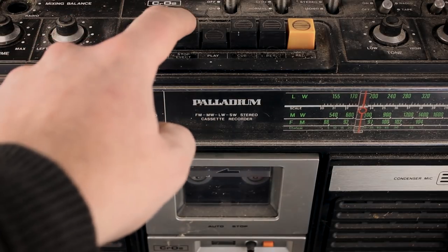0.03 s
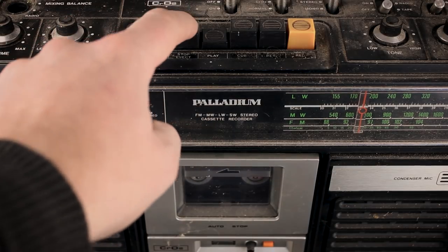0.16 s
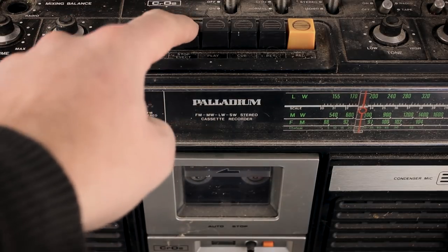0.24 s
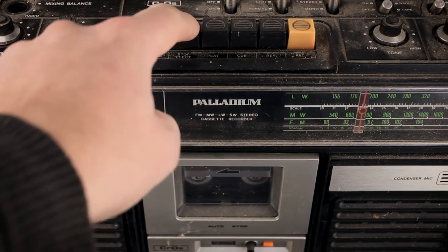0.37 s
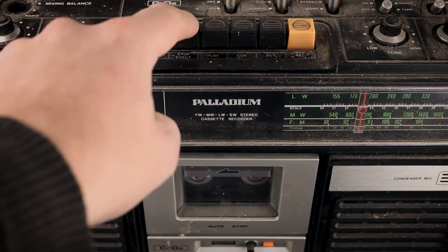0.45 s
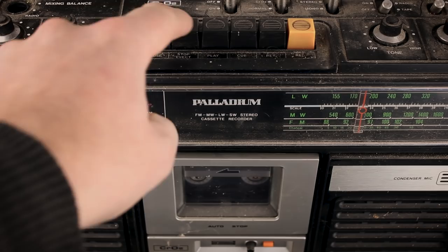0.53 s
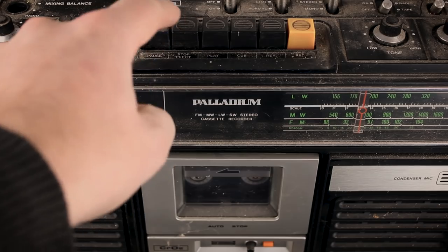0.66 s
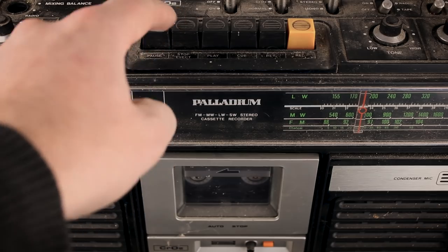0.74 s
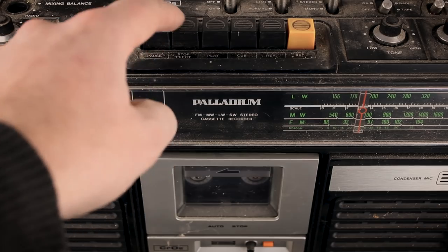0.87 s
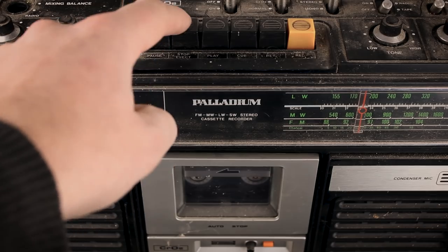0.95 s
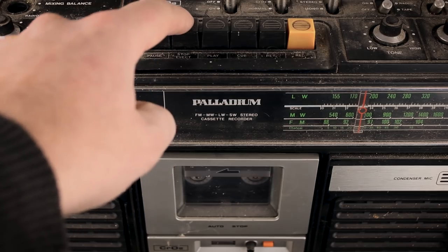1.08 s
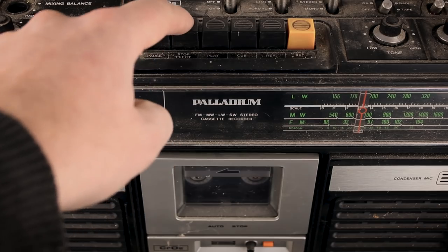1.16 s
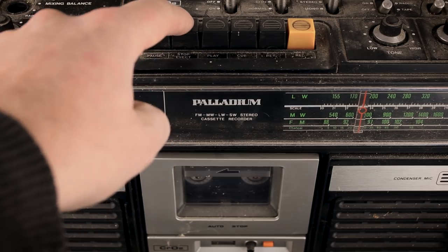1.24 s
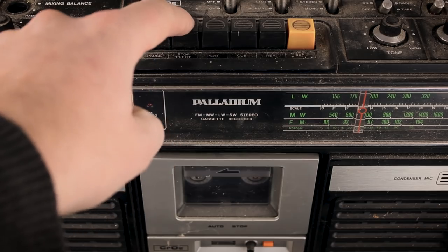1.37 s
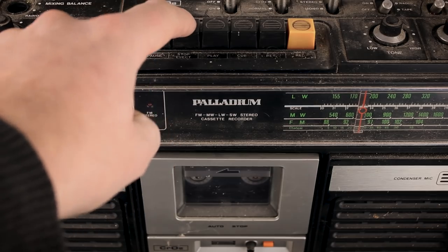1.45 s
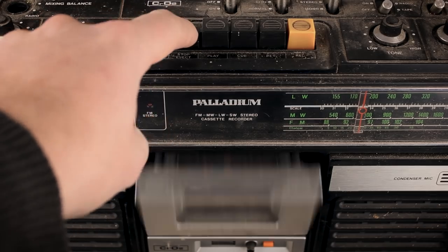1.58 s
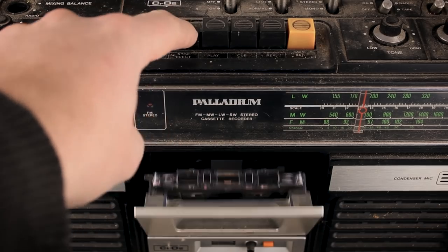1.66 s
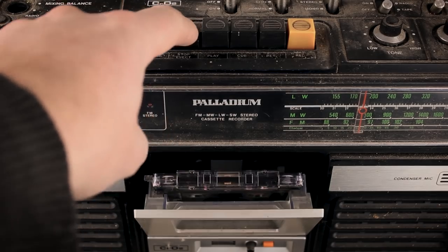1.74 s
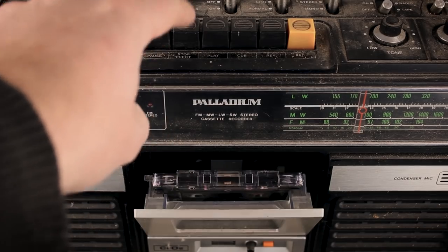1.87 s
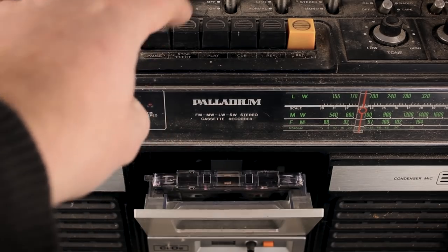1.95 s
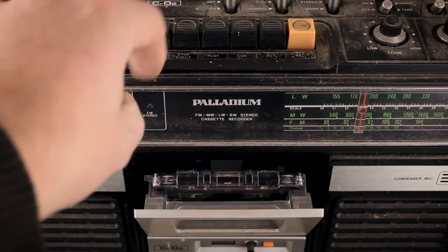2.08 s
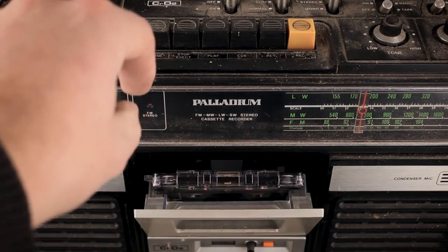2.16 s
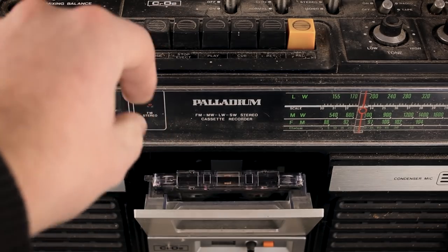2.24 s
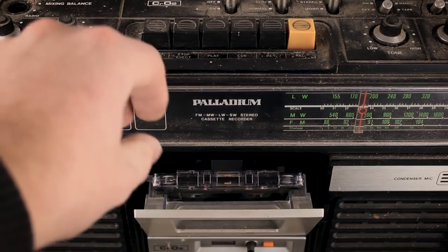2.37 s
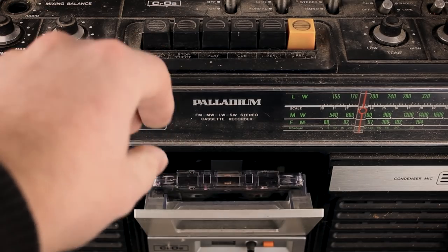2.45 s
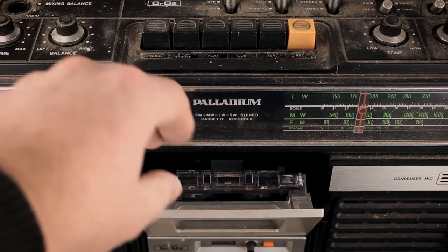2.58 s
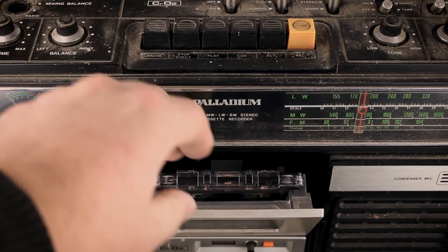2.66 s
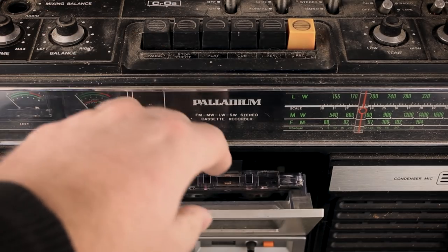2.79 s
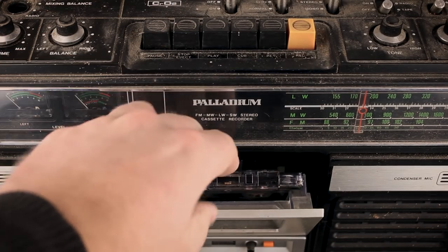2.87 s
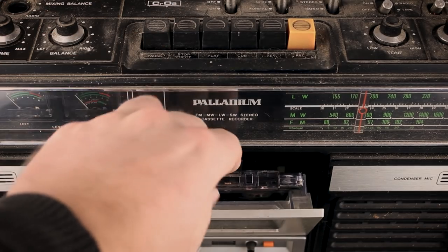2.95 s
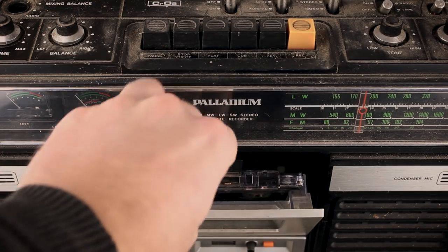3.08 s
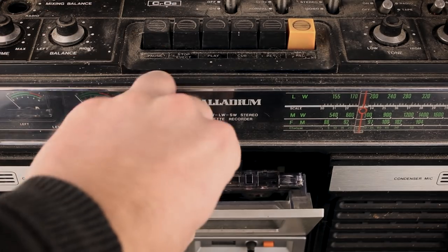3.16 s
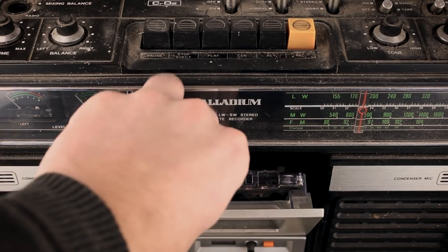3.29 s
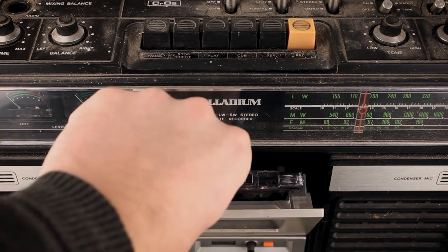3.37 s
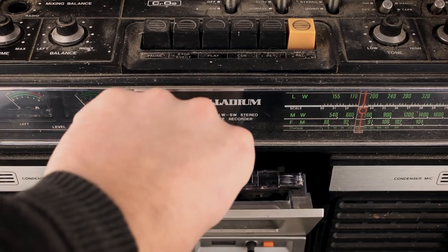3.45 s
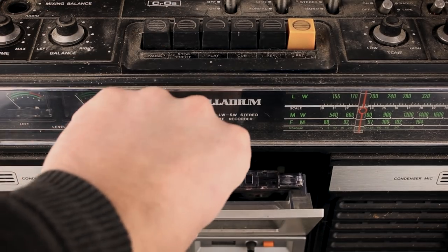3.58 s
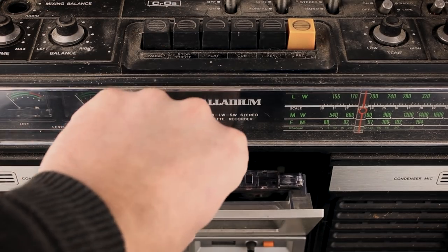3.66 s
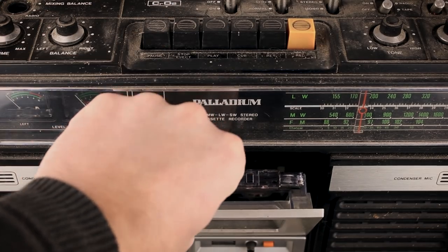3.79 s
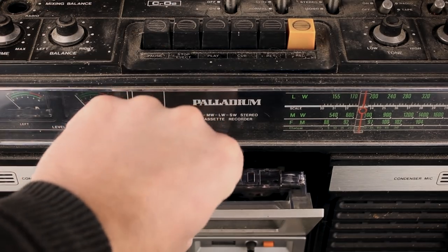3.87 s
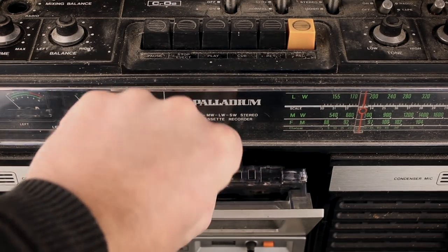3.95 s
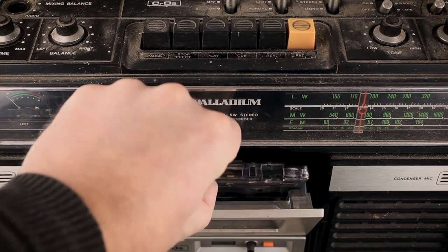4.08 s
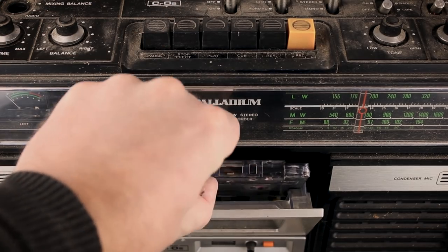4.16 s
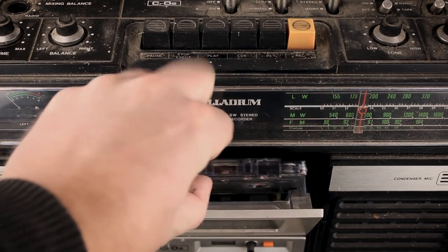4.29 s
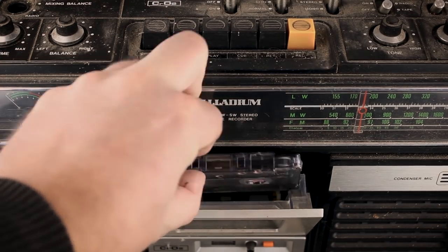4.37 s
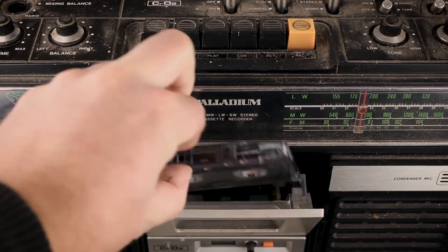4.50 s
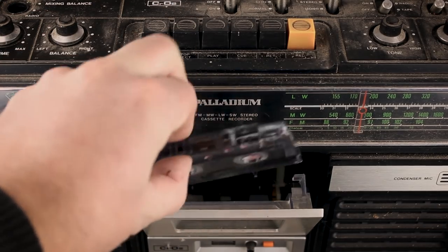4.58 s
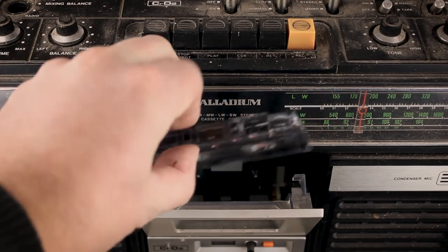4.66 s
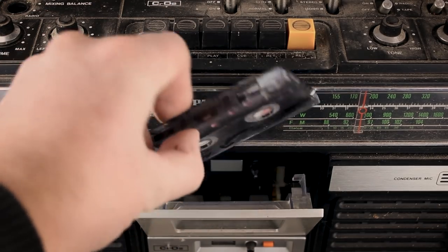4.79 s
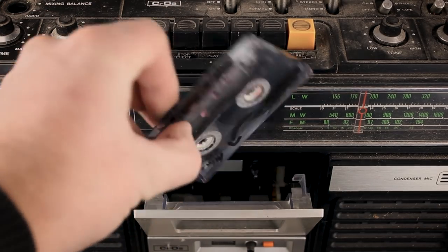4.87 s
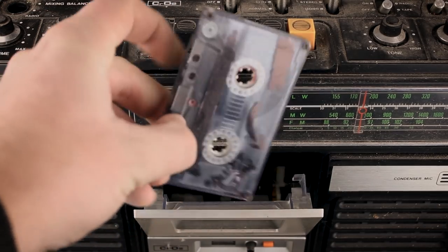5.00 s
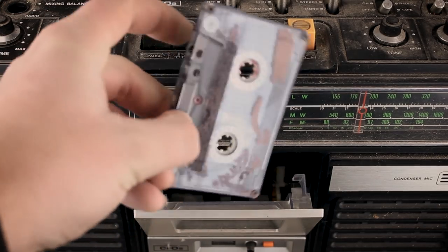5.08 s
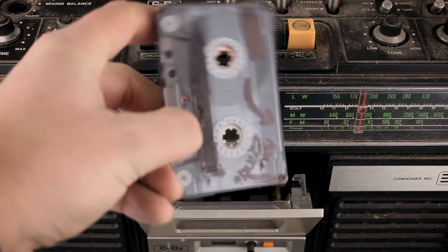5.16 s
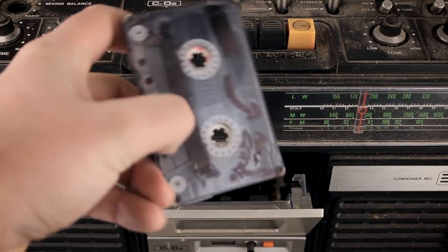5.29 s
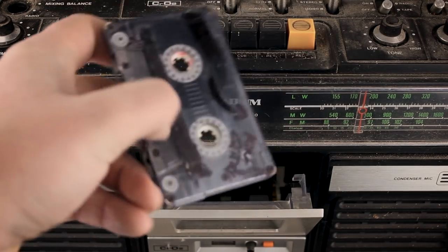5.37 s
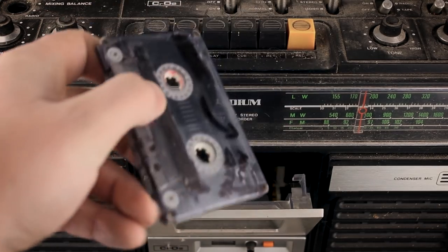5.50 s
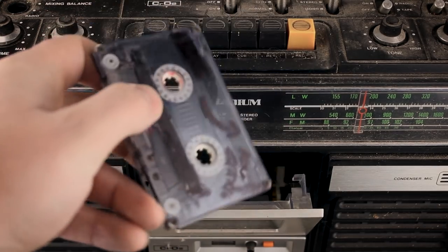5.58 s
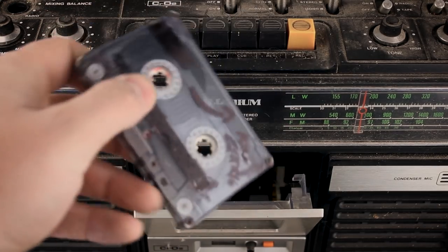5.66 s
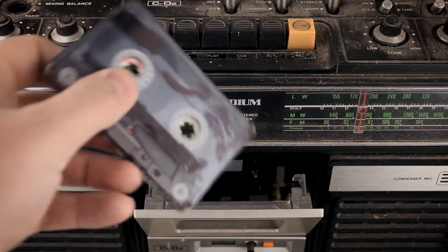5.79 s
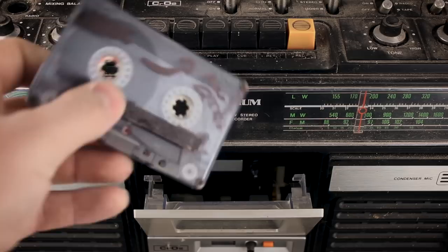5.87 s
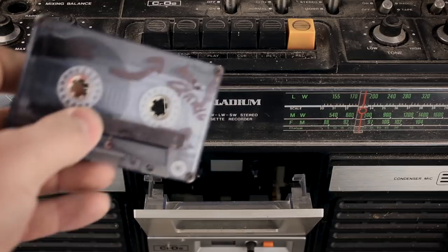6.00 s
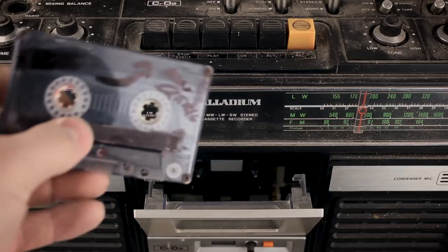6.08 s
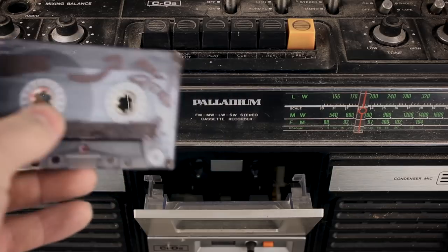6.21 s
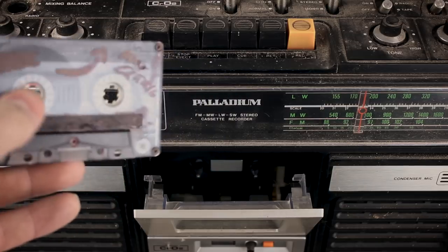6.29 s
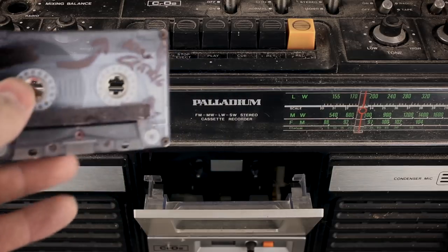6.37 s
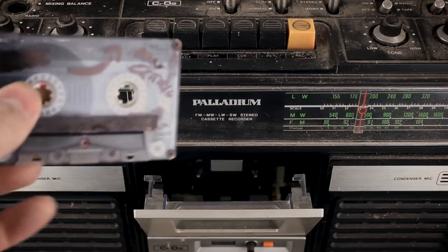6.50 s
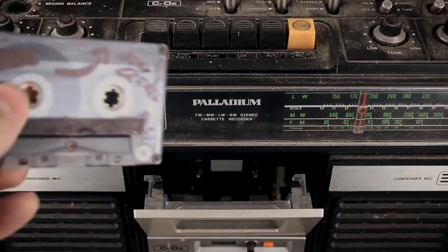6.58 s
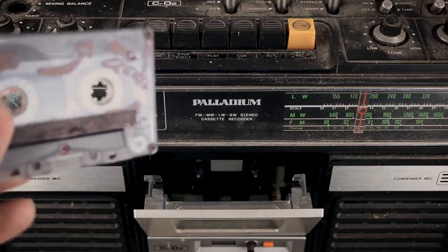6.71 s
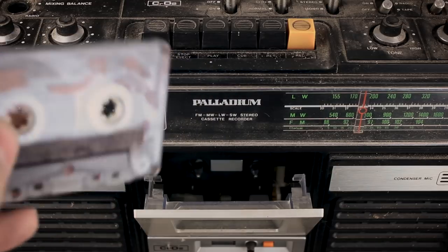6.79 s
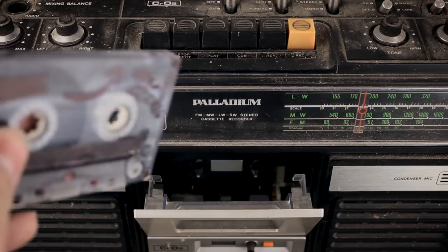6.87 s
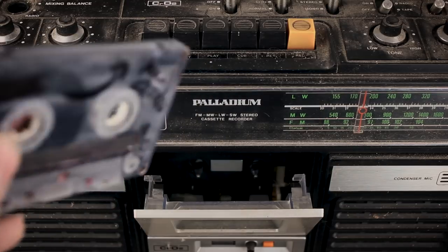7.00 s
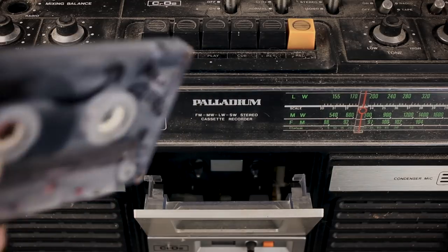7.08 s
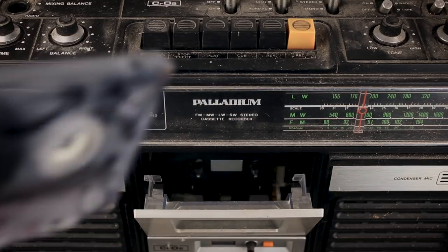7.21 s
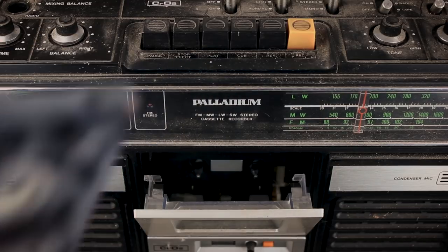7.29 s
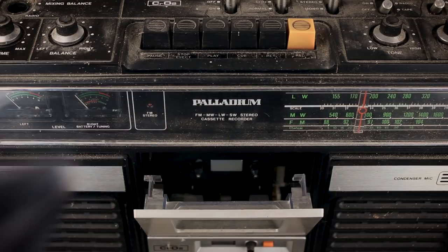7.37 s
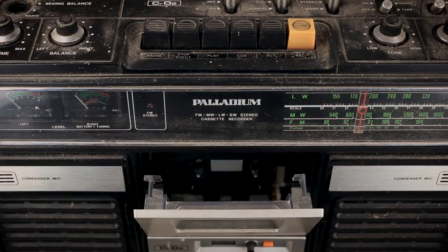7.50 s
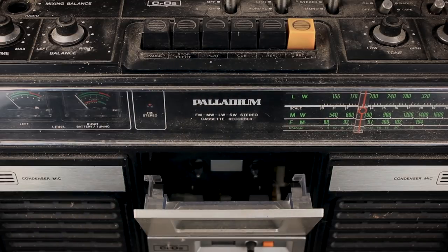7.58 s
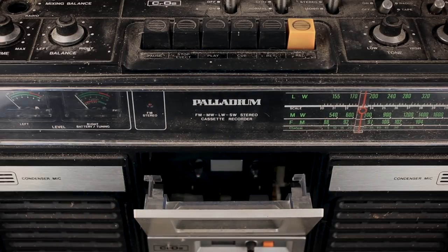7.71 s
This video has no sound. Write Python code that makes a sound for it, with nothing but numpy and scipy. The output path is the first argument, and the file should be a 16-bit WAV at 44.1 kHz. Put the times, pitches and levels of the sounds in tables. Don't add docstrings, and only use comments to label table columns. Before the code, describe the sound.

Close-up handling of an old tape deck: a sharp, loud key snap, a smaller release click, then a spring-loaded door clacking open and rattling against its stop, the hollow case resonating. Quiet brushing follows as a hand reaches over, then a cluster of plastic knocks and scrapes as the tape comes out. Soft sliding fingers and tiny loose-reel ticks finish it, with low room hum and hiss.

```python
import sys
import numpy as np
from scipy import signal
from scipy.fft import rfft, irfft, next_fast_len
from scipy.io import wavfile
from scipy.ndimage import uniform_filter1d, map_coordinates

SR = 44100
rng = np.random.default_rng(int(sys.argv[2]) if len(sys.argv) > 2 else 0)


def waveform_to_disk(signal):
    frames = np.transpose(np.atleast_2d(signal))
    scaled = np.clip(frames, -1, 1) * 32767
    samples = np.round(scaled).astype(np.int16)
    wavfile.write(sys.argv[1], SR, samples)


def gain_from_db(level_db):
    decades = np.asarray(level_db, float) / 20
    return 10 ** decades


N = 341533

# low edge in Hz, high edge in Hz.
EDGES_HZ = [(110, 700), (700, 2500), (2500, 8000), (8000, 16000)]
# pitch in Hz, width in Hz, level in dB.
SHELL = [(2400, 200, -2), (2850, 300, 3), (4800, 400, -3), (5750, 250, 0), (6500, 400, -1),
         (11000, 1200, -4)]


def band(x, lo_hz, hi_hz):
    return signal.sosfilt(signal.butter(2, [lo_hz, hi_hz], "band", fs=SR, output="sos"), x)


def unit(x):
    return x / np.sqrt(np.mean(x ** 2))


def flutter(count, size):
    return unit(uniform_filter1d(uniform_filter1d(rng.standard_normal(count), size), size))


def ring(x, modes):
    out = 0
    for hz, db, t60 in modes:
        r = np.exp(-np.log(1000) / (t60 * SR))
        w = 2 * np.pi * hz / SR
        out = out + gain_from_db(db) * signal.lfilter([0, r * np.sin(w)], [1, -2 * r * np.cos(w), r * r], x)
    return out


def air():
    # frequency in Hz, density in dB per Hz.
    tone_spectrum = [(24, -37.5), (60, -13), (151, -4.5), (430, 2.5), (760, -4), (2050, -7), (6170, -9),
                     (16000, -12.5)]
    # pitch in Hz, level in dB, decay t60 in s.
    hum_modes = [(59.6, -79, 0.72), (148, -77, 0.13)]
    size = next_fast_len(N)
    hz, db = np.transpose(tone_spectrum)
    shape = gain_from_db(np.interp(np.log(np.fft.rfftfreq(size, 1 / SR) + 1), np.log(hz), db))
    tone = unit(irfft(rfft(rng.standard_normal(size)) * shape, size)[:N])
    hum = 0
    for hz, db, t60 in hum_modes:
        hum = hum + gain_from_db(db) * unit(ring(rng.standard_normal(N), [(hz, 0, t60)]))
    fade = gain_from_db(-9.5 * np.linspace(-.5, .5, N))
    return gain_from_db(-63.5) * tone + hum * fade


def grit(count, spread_db, grain=12):
    size = gain_from_db(spread_db * np.minimum(rng.exponential(size=count // grain + 1), 3.5))
    return unit(np.repeat(size, grain)[:count] * rng.standard_normal(count))


def strike(blows, thump_db, spread_db=1.5):
    force, ms = np.zeros((4, N + 4096)), np.arange(4096) * 1000 / SR
    linger = np.array([[1.4], [1.0], [.8]])
    crack = gain_from_db(2.0) * np.exp(-ms / 0.48)
    for s, db, knock_db, tick_db, chatter_ms in blows:
        dying = np.exp(-(ms / (linger * max(chatter_ms, .5))) ** 0.94)
        shape = crack + (1 - np.exp(-ms / 0.95)) * dying
        chatter = grit(4096, spread_db) * shape
        chatter *= np.sqrt(np.sum(shape ** 2) / np.sum(chatter ** 2))
        i, knock = int(s * SR), db + knock_db
        force[0, i] += gain_from_db(knock + thump_db + 14 - 0.2066 * (knock + 30))
        force[1:, i:i + 4096] += gain_from_db(db - 7.0 + np.array([[knock_db], [0], [tick_db]])) * chatter
    return force[:, :N]


def resonate(x, peaks, through_db=-3):
    out = gain_from_db(through_db) * x
    for hz, width, db in peaks:
        out = out + gain_from_db(db) * signal.lfilter(*signal.iirpeak(hz, hz / max(width, 60), fs=SR), x)
    return out * np.sqrt(np.sum(x ** 2) / np.sum(out ** 2))


def voice(force, peaks, through_db=-3):
    centres_hz = [350, 1150, 3900, 11000]
    size = next_fast_len(N)
    place = np.interp(np.log(np.fft.rfftfreq(size, 1 / SR) + 1), np.log(centres_hz), np.arange(4))
    blend = 0
    for k in (1, 2, 3):
        lo, hi = EDGES_HZ[k]
        weight = np.sqrt(SR / 2 / (hi - lo)) * np.clip(1 - abs(place - k), 0, 1)
        blend = blend + weight * rfft(force[k], size)
    return resonate(irfft(blend, size)[:N], peaks, through_db)


def coils(x, modes):
    out = 0
    for mode in modes:
        dips_db = 10 * np.minimum(flutter(N, size=1500), .5)
        out = out + ring(x, [mode]) * gain_from_db(dips_db)
    return out


def key_levers():
    # start in seconds, clack peak in dB, knock re clack in dB, tick re clack in dB, chatter in ms.
    blows = [
        (.1086, -49, 5.5, -3, 31),
        (.1240, -21, -9, -3.5, 9.5),
        (.2106, -16.5, -5, 10, 6.3),
        (.2153, -6, -14, -1, 2.4),
        (.2216, -10, -13, 2.5, 3.3),
        (.2241, -12, -8, -3, 4.7),
        (.4815, -46, 3.5, 2, 13),
        (.494, -49, 1, 13, 13),
        (.4982, -19, -6, 4, 14.7),
        (.5027, -20.5, -8, -3, 6.9),
    ]
    # pitch in Hz, width in Hz, level in dB.
    lever = [(1160, 1370, -2), (4330, 470, -12), (13100, 3800, -5)]
    # pitch in Hz, level in dB, decay t60 in s.
    spring_modes = [(117.4, -0.5, 0.858), (244, -21.5, 3.8), (318, -24.5, 0.295), (358, -24, 2.5),
                    (432, -14, 2.6), (497, -4.5, 1.5), (615, -16.5, 1.5), (1063, -15, 1.94)]
    force = strike(blows, thump_db=-15.5)
    return force, voice(force, lever) + gain_from_db(-26.0) * coils(force[0], spring_modes)


def hollow_case(force):
    # pitch in Hz, level in dB, decay t60 in s.
    case_modes = [(146, 0.5, 0.14), (170.4, -4.5, 0.25), (212.3, -3.5, 0.24), (276, -17, .15),
                  (365, -20, 0.22), (415, 4, 0.02), (415, 4, 0.037), (440, 4.5, 0.16), (491, 3.5, 0.16),
                  (565.4, -2, 0.21), (654, 6.5, 0.076)]
    panel_modes = [(610, -2, 0.04), (704, 4.5, 0.024), (877, -2.5, 0.06), (998, -3.5, 0.049),
                   (1120, -1.5, 0.041), (1136, -7.5, 0.02), (1400, -12, 0.037), (1550, -21, 0.076),
                   (1800, -12, 0.119), (2010, -5, 0.04)]
    push, knock = force[:2]
    low = band(band(push, *EDGES_HZ[0]), 120, 2000)
    case = gain_from_db(-30.0) * ring(low, case_modes) + gain_from_db(10) * low
    return case + gain_from_db(-36.5) * ring(knock, panel_modes)


def damped_notes(rows, wobble):
    out, t = np.zeros(N + SR), np.arange(SR // 2) / SR
    for s, hz, db, t60 in rows:
        size = int(4 * SR / hz)
        phase = 2 * np.pi * np.cumsum(hz * (1 + wobble * flutter(len(t), size=size))) / SR
        level_db = db - 60 * t / t60 + 2.5 * flutter(len(t), size=size)
        swell = 1 - np.exp(-t * hz / 1.7)
        i = int(s * SR)
        out[i:i + len(t)] += gain_from_db(level_db) * swell * np.sin(phase)
    return out[:N]


def struck_notes():
    # start in seconds, pitch in Hz, peak in dB, decay t60 in s.
    steel_rows = [(.2112, 13200, -7, .014), (0.21, 13300, -9, .012), (0.21, 4500, -8, .008),
                  (.2222, 14000, -17, .025), (1.66, 6500, -41, 0.46), (4.2915, 10200, -27, .05),
                  (4.268, 7700, -27.5, 0.034), (0.5, 11000, -33, .07), (1.707, 8800, -32, .05),
                  (1.708, 1800, -32, 0.052), (4.3984, 10100, -34, 0.12), (4.477, 10100, -36, 0.056),
                  (4.5005, 4800, -33, 0.13), (4.5005, 13200, -30, 0.036)]
    case_rows = [(.212, 458, -35, 0.27), (.500, 334, -41.5, 0.49), (.502, 1077, -30.5, 0.21),
                 (3.186, 137, -40, 0.24), (3.300, 155.5, -44, 0.15), (3.775, 148, -43.5, 0.47),
                 (4.396, 153, -39.5, 0.27), (4.466, 148, -30, 0.15), (4.616, 374, -31, 0.24),
                 (4.630, 142, -35, 0.24), (1.7, 140, -40, .4), (.56, 103, -53, 0.5),
                 (3.992, 538, -39, 0.15)]
    shell_rows = [(1.494, 3290, -50, 0.054), (3.084, 3250, -44, .05), (3.775, 10040, -42, .04),
                  (3.086, 940, -38, 0.049), (3.187, 2710, -40, 0.25), (3.449, 1520, -52, 0.083),
                  (3.449, 2780, -52, .08), (3.586, 1120, -48, 0.072), (3.776, 1930, -40, 0.059),
                  (3.962, 2976, -50, 0.3), (4.036, 1303, -43, 0.068), (4.466, 3400, -37, 0.12),
                  (4.501, 2110, -27.5, 0.095), (4.501, 1210, -32.5, 0.17), (4.615, 1684, -31, 0.12),
                  (4.733, 3450, -38, 0.099), (4.813, 1600, -31, 0.14), (4.813, 3010, -29, 0.092),
                  (5.382, 2040, -38.5, 0.093), (5.382, 345, -46.5, 0.095), (5.383, 194, -44, 0.08),
                  (5.707, 2050, -56, 0.06), (5.856, 3390, -52, .06), (6.415, 805, -49.5, 0.089),
                  (6.415, 3030, -45, 0.071), (6.415, 5600, -38.5, 0.055)]
    return damped_notes(steel_rows, wobble=0.0086) + damped_notes(case_rows + shell_rows, wobble=0.032)


def singing(rows, width, steady):
    out = np.zeros(N + SR)
    for s, length, from_hz, to_hz, db in rows:
        u = np.linspace(0, 1, int(np.clip(length, .01, .5) * SR))
        size = max(int(SR / (2 * width * from_hz)), 2)
        friction = flutter(SR // 2, size=size) + 1j * flutter(SR // 2, size=size)
        drive = steady + friction[:len(u)]
        phase = 2 * np.pi * np.cumsum(from_hz + (to_hz - from_hz) * u) / SR
        swell = np.sin(np.pi * u ** 0.63)
        i = int(s * SR)
        out[i:i + len(u)] += gain_from_db(db) * swell * unit((drive * np.exp(1j * phase)).real)
    return out[:N]


def rubbed_edges():
    # start in seconds, length in seconds, from Hz, to Hz, rms in dB.
    case_rows = [(.36, 0.17, 435, 430, -59), (.55, 0.41, 429.5, 429, -65), (.68, 0.5, 1063, 1055, -77.5),
                 (1.95, 0.57, 1094, 1094, -78), (1.625, 0.02, 410, 390, -33), (1.66, 0.033, 388, 390, -34),
                 (1.712, 0.024, 403, 406, -38), (1.735, 0.036, 383, 360, -35), (1.78, 0.049, 356, 405, -47),
                 (3.09, 0.11, 463, 382, -54), (3.2, 0.05, 333, 428, -48), (3.29, 0.076, 432, 425, -53),
                 (3.59, 0.14, 440, 406, -59), (3.78, 0.11, 430.5, 393, -55),
                 (4.215, 0.036, 426, 420, -46.5), (4.265, 0.043, 420, 426, -38), (4.3, 0.08, 429, 429, -33),
                 (4.345, .05, 428, 436, -36.5), (4.405, 0.053, 436, 417, -35.5),
                 (4.465, 0.051, 381, 403, -35), (4.515, 0.026, 360, 400, -36.5),
                 (4.615, 0.042, 467, 393, -37.5), (4.705, 0.12, 431, 415, -51),
                 (4.83, 0.034, 401, 400, -42.5), (4.815, 0.064, 201, 186, -51), (1.85, 0.21, 149, 160, -57),
                 (3.915, 0.06, 450, 430, -50)]
    shell_rows = [(2.9, 0.11, 2530, 2570, -65), (2.9, .08, 4720, 4720, -70),
                  (2.91, 0.083, 3100, 3070, -65.5), (2.91, .06, 6140, 6200, -77),
                  (3.095, 0.076, 820, 816, -60), (3.095, 0.064, 1070, 1050, -54.5),
                  (3.184, 0.029, 1600, 1660, -42), (4.225, 0.13, 2220, 2210, -40.5),
                  (4.25, 0.098, 9900, 10200, -41), (4.27, 0.061, 1498, 1460, -44),
                  (4.462, 0.057, 1037, 988, -37), (4.613, 0.037, 1100, 1043, -36.5),
                  (4.69, 0.097, 1500, 1600, -42), (4.7, 0.072, 2240, 2260, -46),
                  (4.855, .05, 1750, 1770, -43), (4.865, 0.058, 1066, 1100, -46),
                  (5.69, .05, 1360, 1510, -58), (5.85, 0.067, 2784, 2760, -59),
                  (5.9, 0.11, 2740, 2717, -57), (5.89, 0.093, 2040, 2090, -62),
                  (5.94, 0.035, 5800, 5740, -57), (6.185, 0.087, 2330, 2360, -61.5),
                  (6.21, 0.1, 2810, 2930, -61.5), (6.2, 0.056, 6590, 6540, -68),
                  (6.32, 0.12, 2160, 2880, -63.5), (6.33, .09, 5890, 5770, -63), (6.3, .1, 7050, 6980, -65),
                  (6.77, 0.066, 6800, 6900, -54), (6.77, 0.098, 11200, 11200, -49)]
    return singing(case_rows, width=.03, steady=2.5) + singing(shell_rows, width=.09, steady=.3)


def slide(strokes, rasp_db, spread_db, flicker_db):
    power, t = np.zeros((4, N)), np.arange(N) / SR
    pressure = flutter(N, size=400)
    grains = grit(N, spread_db) * gain_from_db(flicker_db * pressure)
    for touch, hardest, lift, db, bright_db in strokes:
        before = (hardest - t) / max(hardest - touch, .005)
        after = (t - hardest) / np.clip(lift - hardest, .005, .6)
        away = np.maximum(before, after)
        near = away < 1.5
        away = away[near]
        colour_db = np.array([[-bright_db], [-bright_db], [rasp_db], [bright_db]])
        swell_db = -25.5 * away ** 1.215
        power[:, near] += np.minimum(3 - 2 * away, 1) ** 2 * gain_from_db(db + colour_db + swell_db) ** 2
    return np.sqrt(power) * grains


def sliding_fingers():
    # touch in s, hardest in s, lift in s, pressure in dB, brightness in dB.
    reaches = [
        (.85, .95, 1.45, -70, 2),
        (1.0, 1.1, 1.3, -76, 2.2),
        (1.1, 1.2, 1.25, -70, 3),
        (2.08, 2.19, 2.9, -68.5, 3.6),
        (2.45, 2.64, 2.8, -78, 9.1),
        (2.86, 2.942, 3.02, -61, 1.2),
        (2.98, 3.05, 3, -69, 5),
    ]
    turns = [(4.894, 5.06, 5.56, -64, 3), (5.097, 5.272, 7.2, -72.5, 9), (5.358, 5.41, 5.55, -59, 5.5),
             (5.39, 5.51, 5.6, -58, 6.5), (5.628, 5.688, 5.85, -52, 3.5), (5.797, 5.876, 5.85, -57.5, 3),
             (5.87, 5.934, 6.06, -54, 3.5), (6.166, 6.208, 6.4, -56.5, 3), (6.25, 6.364, 6.5, -58.5, 3.5),
             (6.587, 6.712, 6.89, -51, 6), (6.695, 6.819, 6.67, -45.5, 7), (7.025, 7.045, 7.2, -69.5, 11),
             (7.25, 7.497, 9.8, -67.5, 0.5), (7.405, 7.746, 8.2, -59.5, 4.5)]
    skin = gain_from_db(-1.0) * slide(reaches + turns, rasp_db=1.5, spread_db=-2.0, flicker_db=1.23)
    return voice(skin, SHELL, through_db=13.0)


def door():
    # start in seconds, clack peak in dB, knock re clack in dB, tick re clack in dB, chatter in ms.
    blows = [(1.494, -49.5, -3, -10, 15), (1.5378, -31, -5, -11.5, 13.5), (1.5793, -37, 0, -5, 14),
             (1.589, -42, 8, -8, 8), (1.6003, -28.5, 3, 3, 6.5), (1.6042, -7.5, -5.5, 1.5, 4.4),
             (1.6198, -18.5, 1.5, -6, 10), (1.6306, -18, 0, -12, 7.1), (1.6454, -13.5, -11, 6.5, 4),
             (1.6482, -5.5, -3.5, -3, 1.9), (1.6508, -10, -5.5, 5.5, 4.8), (1.6682, -33, 3, -23, 1.4),
             (1.7045, -26, -2, -3.5, 21), (1.7402, -32.5, 3.5, 0.5, 17), (1.752, -33, 3.5, -15, 9.2),
             (1.8295, -29, -10.5, -2.5, 16), (1.843, -27.5, -4, -16, 13), (1.8637, -15.5, -8, 3.5, 5.8),
             (1.8785, -29.5, 0.5, 1.5, 8)]
    # pitch in Hz, width in Hz, level in dB.
    door_peaks = [(1100, 200, -10), (1500, 720, -8), (3220, 430, -8.5), (6530, 250, -8.5),
                  (9000, 1200, -19), (10100, 370, -9), (12700, 2400, -5.5)]
    force = strike(blows, thump_db=-10)
    return force, voice(force, door_peaks)


def door_springs(push):
    # pitch in Hz, level in dB, decay t60 in s.
    spring_modes = [(109, -19, 1.4), (136.7, 0, 0.93), (245.2, -10, 1.3), (358, -28, 5),
                    (426.2, -19.5, 2.7), (565, -23, 1.6), (667, -24, 3.5), (1094, -25, 1.43)]
    return gain_from_db(-35.0) * coils(push, spring_modes)


def holder():
    # start in seconds, clack peak in dB, knock and tick re clack in dB, chatter in ms.
    grip_blows = [(3.0856, -35, 7, -6.5, 6), (3.1795, -37, 1, -2, 8.9), (3.184, -24.5, -2, -5, 6.8),
                  (3.1915, -29.5, 1.5, -12, 10), (3.3019, -38.5, -10, -32.5, 7.7),
                  (3.316, -48, 6, -20, 6.1), (3.4479, -51.5, 5.5, 0, 12), (3.5866, -50, 12.5, -22, 14),
                  (3.6316, -47.5, 9, -39, 3.8), (3.7181, -41.5, 2, -27, 4.9), (3.7737, -33.5, 2, 3.5, 4.9),
                  (3.8663, -49, -10, -1, 10), (3.9165, -41, 3, -6, 5.1), (3.931, -35.5, -15, -7, 6),
                  (3.9616, -50.5, -7, 2.5, 67), (3.983, -40, -3, -4, 5), (3.9915, -34, 0, -8, 8),
                  (4.030, -37.5, 3.5, -12, 5.8), (4.0375, -36, -1, -13, 8.1), (4.0628, -55, 17, -15, 9.3)]
    pull_blows = [(4.1972, -40, -4, 5.5, 3.5), (4.2135, -42, 4, 0, 8), (4.221, -34, 1, 0, 4.6),
                  (4.2314, -38, 6, 6, 17), (4.248, -32.5, 5, -12, 10), (4.2632, -26, -4, 0, 12),
                  (4.2815, -25.5, -1, 0, 5.9), (4.2685, -25.5, -3, -1, 8), (4.292, -23, 1.5, 1, 6),
                  (4.304, -39, -11, -6, 3.9), (4.318, -39, -5, -6, 4.6), (4.343, -37, -4, -6, 4),
                  (4.334, -34, 9, 2, 5.6), (4.3893, -40, -5, 6, 3), (4.3921, -27.5, 2.5, 7, 4.3),
                  (4.3973, -22, 1, 5, 6.1), (4.408, -29, -2, -2, 7.3), (4.4197, -33.5, 13, -16, 2.2),
                  (4.4634, -26.5, 10.5, -18, 11), (4.4705, -26, 2, -12, 6.7), (4.4755, -19.5, -2, -5, 6.4),
                  (4.484, -30, 0, -8, 4.4), (4.5001, -14.5, -6, -4, 6.5), (4.516, -31, -14, -12, 5),
                  (4.535, -30.5, 5, -6, 5.4), (4.6142, -17, -1.5, -14.5, 4.1), (4.619, -25.5, 6, -16, 10.6),
                  (4.6391, -29.5, 5, -24, 3.6), (4.654, -32.5, 10.5, -10, 3.9), (4.669, -37, 12, -17, 12),
                  (4.6969, -35, -1, -1.5, 29), (4.712, -36, -2, -8, 5), (4.751, -38, -2, -8, 5.1),
                  (4.7328, -32.5, 2.5, -20, 22), (4.8107, -18.5, -2.5, -26, 9.4), (4.8265, -29, 1, -17, 12),
                  (4.8634, -33, 0, -23, 24), (4.8751, -35, -16, -3.5, 15), (4.893, -34, -3, -5, 4)]
    # touch in s, hardest in s, lift in s, pressure in dB, brightness in dB.
    strokes = [(3.0, 3.06, 4.4, -63.5, 4), (3.12, 3.26, 3.65, -60.5, -6), (3.3, 3.34, 3.44, -56, 0),
               (3.585, 3.6, 4.04, -74.5, -18), (3.77, 3.79, 4, -58, -12.5), (3.86, 3.96, 4.1, -49, -5),
               (4.0, 4.11, 4.64, -53.5, -4), (4.2, 4.284, 4.455, -35.5, -3), (4.4, 4.68, 5.05, -48, 0),
               (4.6, 4.77, 4.3, -52.5, -10), (4.88, 4.97, 5.03, -60, 16.5)]
    # pitch in Hz, width in Hz, level in dB.
    holder_peaks = [(1600, 360, -11), (2280, 150, -4.5), (3020, 240, -5), (4530, 1400, -11),
                    (7500, 630, -11.5), (10170, 930, -5), (12700, 1300, -10)]
    scrape = gain_from_db(-5.5) * slide(strokes, rasp_db=-0.5, spread_db=1.0, flicker_db=2.0)
    scrape[0] *= gain_from_db(-4.5)
    force = strike(grip_blows, thump_db=-11.5) + strike(pull_blows, thump_db=-14.5) + scrape
    return force, voice(force, holder_peaks)


def loose_reels():
    # start in seconds, clack peak in dB, knock re clack in dB, tick re clack in dB, chatter in ms.
    blows = [(5.014, -45, 2, -28, 3.7), (5.109, -68, 23.5, -15, 4.6), (5.2157, -50.5, 11.5, 10.5, 3.5),
             (5.382, -31, -1, -6, 10.2), (5.5092, -48, -2, -12, 11), (5.7069, -42, 10.5, -15, 3.5),
             (5.8541, -37, 0.5, 8.5, 3.2), (6.4145, -37, -4.5, -1, 8), (6.545, -53, -19, 2, 6.9),
             (7.0404, -49.5, -25.5, -13, 5.6), (7.559, -56, 3, -19, 4.2), (7.5722, -57.5, 21.5, -12, 2.4)]
    force = strike(blows, thump_db=-15)
    thump = band(band(force[0], *EDGES_HZ[0]), 140, 2200)
    return voice(force, SHELL) + gain_from_db(14.0) * thump


def room(x, wet_db=-10, gap_ms=2.5):
    # frequency in Hz, decay t60 in s.
    room_decay = [(300, 0.79), (1800, 0.56), (5000, 0.44), (13000, 0.27)]
    t = np.arange(int(.7 * SR)) / SR
    edges = [60, 700, 3000, 8000, 18000]
    tail = 0
    for k, (hz, t60) in enumerate(room_decay):
        tail = tail + band(rng.standard_normal(len(t)), edges[k], edges[k + 1]) * gain_from_db(-60 * t / t60)
    tail = tail * np.clip(t * 1000 / gap_ms - 1, 0, 1)
    wet = gain_from_db(wet_db) * signal.fftconvolve(x, tail / np.sqrt(np.sum(tail ** 2)))[:N]
    drift_ms = .06 * flutter(N, size=120)
    return map_coordinates(wet, [np.arange(N) + drift_ms * SR / 1000], mode="mirror")


def scene():
    floor = air()
    key_force, key_sound = key_levers()
    door_force, door_sound = door()
    holder_force, holder_sound = holder()
    machine = key_sound + door_sound + holder_sound
    machine = machine + hollow_case(key_force + door_force + holder_force)
    machine = machine + door_springs(door_force[0] + 0.18 * holder_force[0])
    near = machine + sliding_fingers() + loose_reels()
    tones = struck_notes() + rubbed_edges()
    return (near + tones + room(near + 0.38 * tones) + floor)[None]


def top_cut(x):
    return signal.sosfilt(signal.butter(12, 16800, fs=SR, output="sos"), x)


def record(dry):
    mic = signal.sosfilt(signal.butter(4, 48, "high", fs=SR, output="sos"), dry)
    mic = signal.sosfilt(signal.butter(2, 15000, fs=SR, output="sos"), mic)
    mic = .64 * np.tanh(mic / .64)
    cut = signal.sosfilt(signal.ellip(8, .2, 45, 15900, fs=SR, output="sos"), mic)
    return top_cut(cut)


dry = scene()
out = record(dry)
waveform_to_disk(out)
```